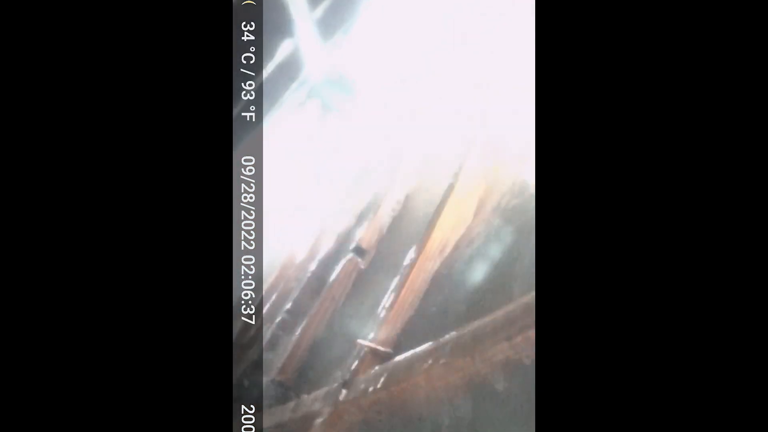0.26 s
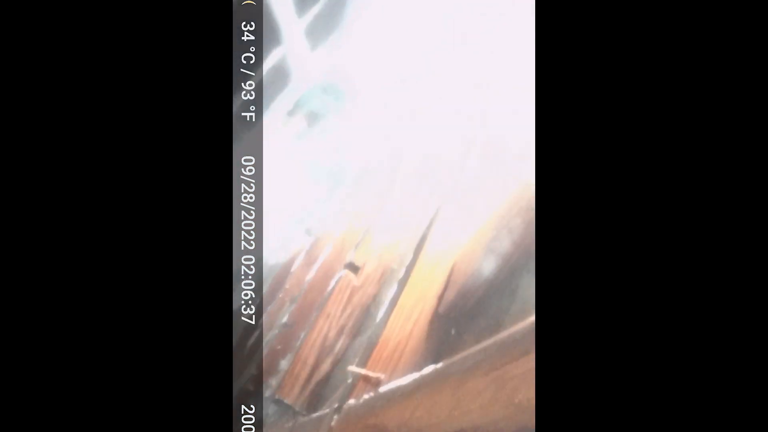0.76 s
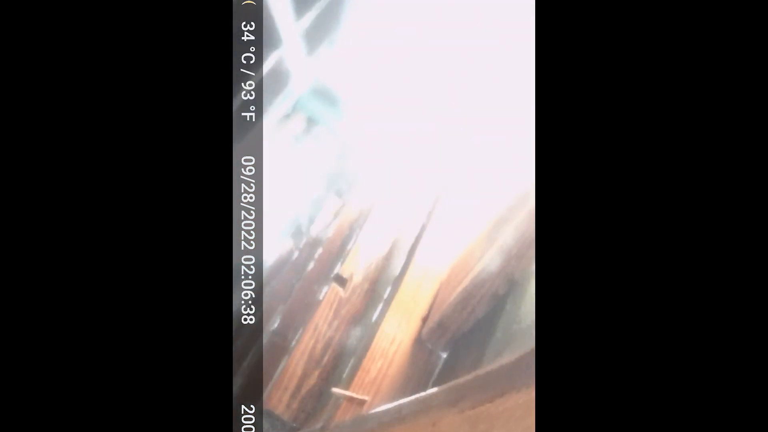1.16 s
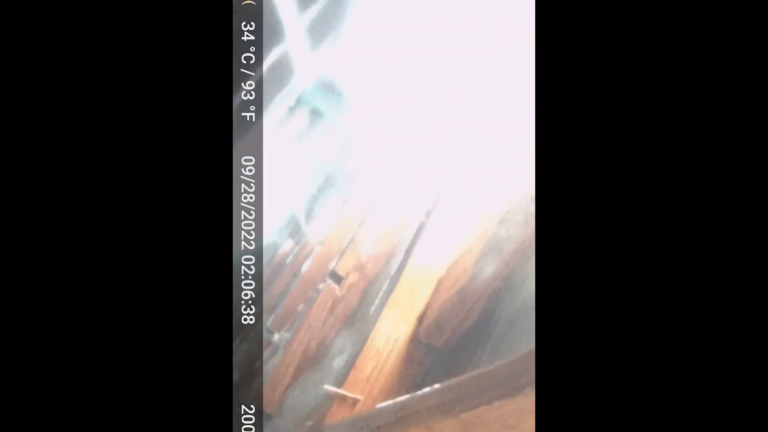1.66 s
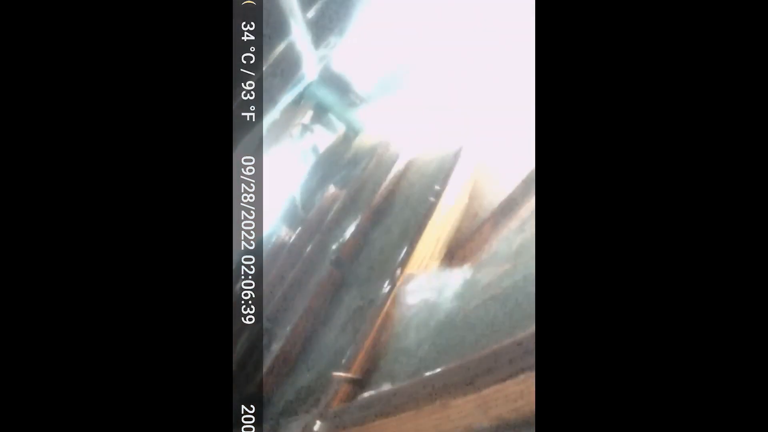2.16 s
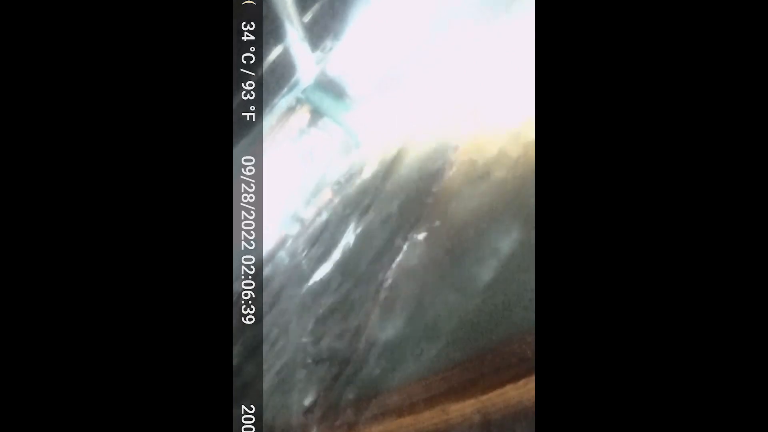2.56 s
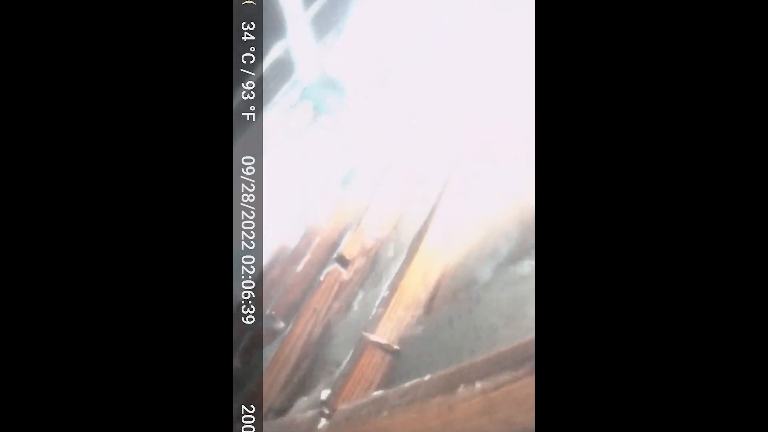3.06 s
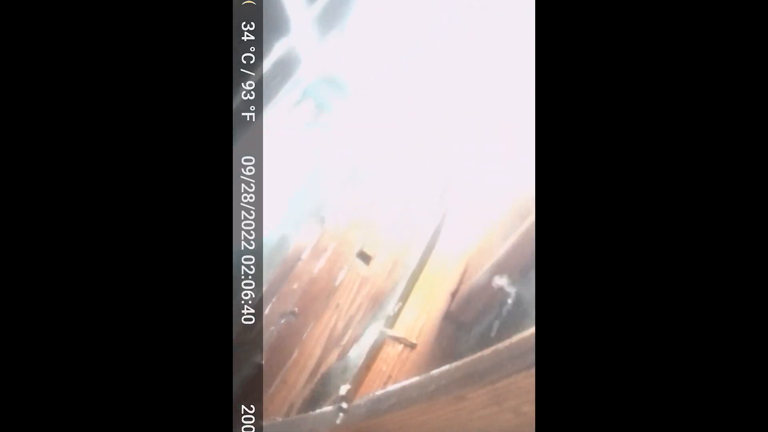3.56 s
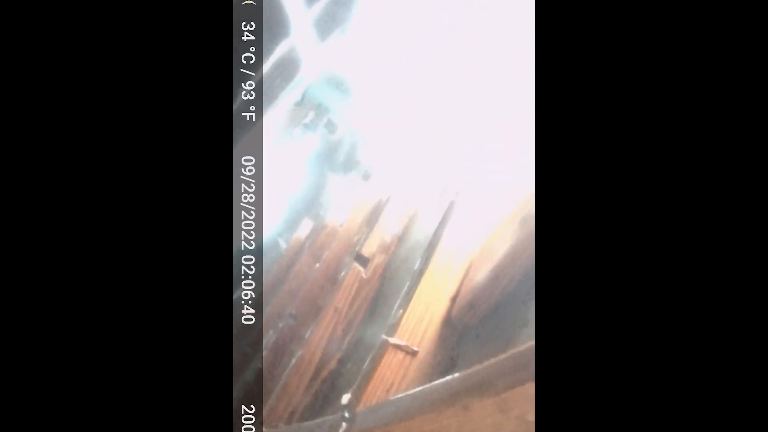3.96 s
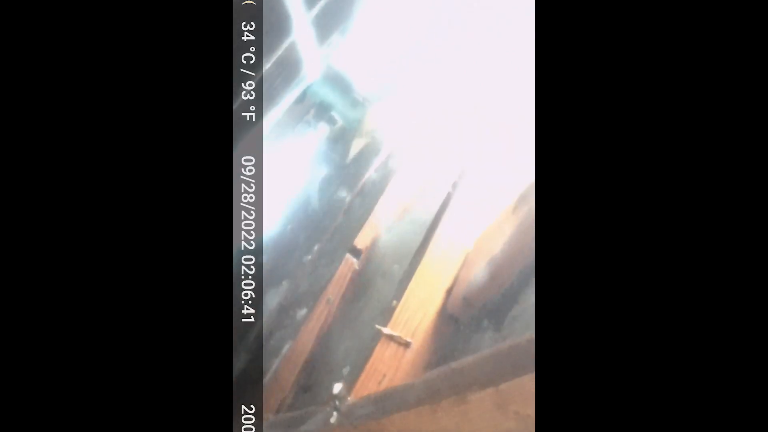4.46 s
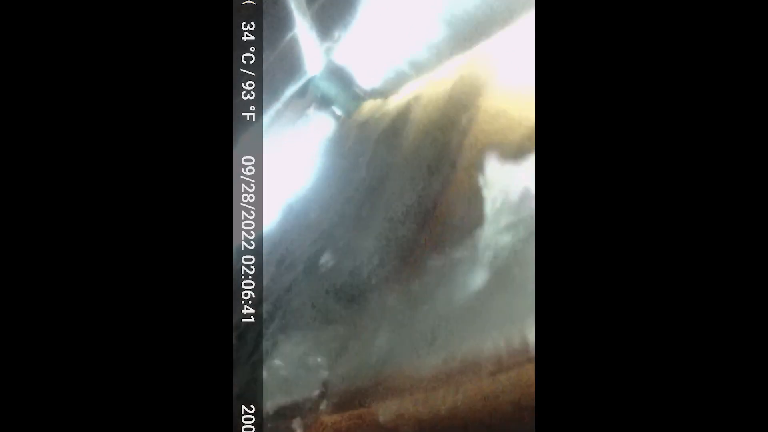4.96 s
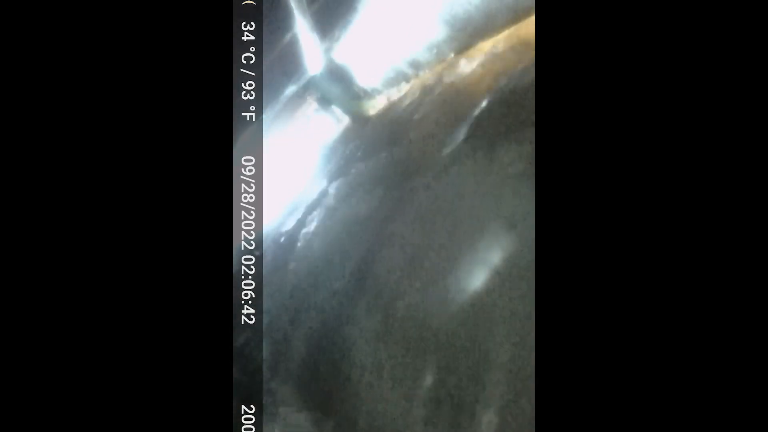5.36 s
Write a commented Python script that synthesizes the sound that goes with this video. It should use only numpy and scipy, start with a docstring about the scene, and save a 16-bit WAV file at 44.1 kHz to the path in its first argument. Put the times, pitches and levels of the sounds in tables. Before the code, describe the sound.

A harsh, distorted mid-low roar of wind and water surges and sputters, eases slightly, then swells again with knocks, spray and ticks.

```python
"""A roar near 480 Hz surges and crackles: hurricane wind and surf over a small outdoor camera housing.
Flow rings the housing's cavity (warped noise plus a tone) and buffets the port with low noise and thuds.
Water slaps drive the cavity; spray, bubbles and drops are noise ticks and short decaying notes.
The overloaded microphone saturates, droops and clips; sheets of water choke the port."""
import sys
import numpy as np
from scipy import signal
from scipy.fft import rfft, irfft, next_fast_len
from scipy.io import wavfile
from scipy.ndimage import map_coordinates

SR = 44100
rng = np.random.default_rng(int(sys.argv[2]) if len(sys.argv) > 2 else 0)


def pcm_store(signal):
    """Save signal as 16-bit PCM."""
    levels = np.round(np.clip(np.atleast_2d(signal), -1, 1) * 32767)
    wavfile.write(sys.argv[1], SR, levels.astype(np.int16).T)


N = 246959

# flow strength: time_s, roar_db
FLOW_STRENGTH = [(0, -5), (.2, -8), (.45, -9), (.8, -12.5), (1.05, -12.5), (1.302, -14), (1.982, -15.5),
                 (2.392, -6.5), (2.519, -12), (3.031, -13.5), (3.3, -11.5), (3.37, 0), (3.6, -8),
                 (3.95, -9), (4.12, -12), (4.72, -13), (4.9, -4.5), (5.26, -1.5), (5.6, 1)]
# cavity pitch, shifted by water around the opening: time_s, pitch_hz
CAVITY_PITCH = [(0, 485.4), (.47, 462.5), (.64, 486.8), (.69, 525.9), (.9, 477.9), (1.32, 470.7),
                (1.401, 504.1), (1.61, 470.6), (1.741, 511.8), (1.92, 459.7), (2.039, 478.6), (2.34, 452.6),
                (2.563, 483.7), (2.85, 452.3), (2.949, 478.1), (3.121, 459.2), (3.3, 485), (3.371, 452.6),
                (3.519, 520.2), (3.619, 480.4), (3.78, 484.5), (3.879, 505.5), (3.97, 476.2),
                (4.067, 530.2), (4.149, 480.4), (4.372, 497.2), (4.68, 474.7), (5.028, 515.3),
                (5.328, 452.2), (5.419, 493.5), (5.6, 452.5)]
# purity of the cavity's note: time_s, tone_over_ring_db
CAVITY_TONE = [(0, -14), (1.201, -7.5), (1.751, 0), (2.1, -14.5), (3.2, -2), (3.55, -0.5), (3.75, 9.5),
               (3.88, -2.5), (4.05, 4.5), (4.2, -10.5), (5.6, -21)]
# gusts head-on to the port: crest_s, level_db, width_s
GUSTS = [(.08, -6, .07), (0.314, -2.5, 0.0484), (0.708, -6.5, 0.15), (1.041, -3.5, 0.1107),
         (1.389, -3.5, 0.013), (1.479, -5.5, 0.06), (1.59, -7, .025), (1.834, -9, .022), (2.051, -4, 0.055),
         (2.125, -1.5, 0.069), (2.225, -6, 0.027), (2.3, -8, .03), (2.404, -8, 0.1025), (2.495, -7, 0.0202),
         (2.891, -18.5, 0.013), (3.507, -0.5, 0.034), (3.636, -4.5, .03), (3.699, 1, 0.021),
         (3.872, -1, 0.1058), (3.99, -4.5, 0.0254), (4.349, -8, 0.04), (4.85, -3.5, 0.0566),
         (4.951, -12.5, 0.067), (5.21, -3, 0.07), (5.46, -0.5, 0.035)]
# water striking the housing: start_s, level_db, length_s, thud_relative_db
SLAPS = [(0.015, -3.5, 0.0078, -18.5), (0.065, -16, 0.0086, 5.5), (0.129, -13, .012, -8),
         (0.159, -7, 0.018, -5.5), (0.238, -12, .012, -9.5), (0.393, -12.5, .02, -11),
         (0.431, -15, 0.0092, -25.5), (.58, -6, 0.0068, -10), (0.631, -8.5, 0.004, -8.5),
         (0.643, 8, 0.0238, -9), (0.672, 2.5, 0.0201, -5.5), (0.697, -15, 0.0263, 3),
         (0.757, -15, 0.014, -8.5), (0.845, -11.5, 0.014, -3.5), (0.89, -14.5, .01, -8.5),
         (0.969, -15, 0.0118, -19), (1.04, -11, 0.0187, -8), (1.194, -10.5, 0.0073, -10),
         (1.244, -15, 0.0383, -5.5), (1.303, -14.5, 0.018, -14.5), (1.442, -14.5, 0.015, -12),
         (1.528, -15, 0.0096, -11), (1.567, -14, 0.017, -7.5), (1.634, -11.5, 0.0154, -17),
         (1.666, -5, 0.014, -26.5), (1.723, -21, 0.0494, -24), (1.814, -15.5, 0.0277, -10),
         (1.904, 2.5, 0.00517, 0.5), (1.941, -17.5, 0.0186, 3.5), (2.014, -18.5, 0.011, -3),
         (2.082, 16, 0.01525, 0), (2.167, -12, 0.012, -9), (2.271, -6.5, 0.0057, 5.5),
         (2.37, -2.5, 0.0098, -9.5), (2.657, -10.5, 0.011, -19), (2.749, -15.5, 0.0064, -10),
         (2.781, -11, 0.034, -20.5), (2.837, -16, 0.017, -15.5), (2.94, -15, 0.0164, -16),
         (2.996, -8, 0.00454, -14), (3.082, -9.5, 0.018, -23.5), (3.112, -12.5, .008, -16),
         (3.17, -4.5, 0.015, -20), (3.216, -4.5, 0.0045, -16.5), (3.234, -7.5, 0.0057, -9.5),
         (3.323, 4.5, 0.015, -17.5), (3.413, -2, 0.018, -9), (3.491, -4, 0.017, -5.5),
         (3.519, -12, 0.016, -9), (3.561, -16.5, 0.0042, -6.5), (3.599, -8.5, 0.027, -6.5),
         (3.666, -12.5, 0.012, -9), (3.714, -3.5, 0.019, -8), (3.771, -8, 0.019, -20.5),
         (3.846, -10, 0.009, -4), (3.882, -7, 0.018, -10), (3.922, -5.5, 0.0351, -9),
         (4.009, -2.5, 0.05455, -21), (4.19, -14, 0.0137, -4.5), (4.229, -15.5, 0.0223, -4),
         (4.276, -13, 0.0176, -16.5), (4.321, -7, .014, -10), (4.44, -16, 0.0145, -3),
         (4.498, -8.5, 0.006, 1), (4.513, -6.5, 0.006, -1.5), (4.677, -9.5, 0.0108, -1.5),
         (4.715, -13, 0.0074, -4.5), (4.747, -12.5, 0.0122, 3), (4.823, -6, 0.0054, -12.5),
         (4.841, -8, 0.0028, 5), (4.862, -14, 0.011, -6), (5.019, -2, 0.0046, -3), (5.051, -9, 0.0254, -12),
         (5.215, 8, 0.0055, -8.5), (5.257, -5, 0.034, -19.5), (5.394, -18, 0.021, 22),
         (5.544, -5.5, .06, 6.5)]
# sheets of water sealing the port: middle_s, width_s, depth_db
SEALS = [(.37, 0.014, 7.5), (.568, 0.02, 7), (.625, 0.0091, 7.5), (0.811, 0.0147, 6), (1.175, 0.0207, 6.5),
         (1.229, 0.02, 7.5), (1.339, 0.018, 14), (1.403, 0.017, 21), (1.428, .028, 7), (1.718, 0.0245, 21),
         (1.789, 0.0115, 18), (1.886, 0.012, 8), (1.922, 0.01774, 30), (1.994, 0.011, 14.5),
         (2.074, 0.012, 24.5), (2.472, 0.0209, 13), (2.545, 0.016, 9), (2.73, 0.027, 7), (2.972, 0.0124, 9),
         (3.03, 0.023, 8.5), (3.159, 0.016, 7), (3.562, 0.0129, 22.5), (3.964, 0.0091, 25),
         (4.16, 0.0267, 7.5), (4.259, 0.0119, 6.5), (4.416, 0.0127, 12), (4.468, 0.0124, 22.5),
         (4.613, 0.0076, 7.5), (5.012, 0.0137, 31.5), (5.234, 0.0058, 8.5), (5.312, 0.0077, 17.5),
         (5.364, .006, 12), (5.38, 0.0155, 34.5)]
# air pocket opening at the port: start_s, level_db, start_pitch_hz, decay_s
PLOP = (3.5, -3, 1496.5, 0.0005)
# fine spray on the housing: time_s, level_db
WASH_LEVEL = [(0, -33), (.4, -36), (.8, -46.5), (1.05, -42), (1.3, -48.5), (2, -46), (2.3, -41),
              (3.05, -50.5), (3.3, -42), (3.4, -34), (3.9, -36), (4.15, -45.5), (4.7, -45), (4.95, -35),
              (5.6, -30)]
# short notes mostly near 1 kHz, about an octave above the roar: start_s, level_db, pitch_hz
BLIPS = [(.858, -15, 1042), (.893, -14, 1025), (1.15, -12, 769), (1.261, -18, 930), (1.283, -14, 990),
         (1.413, -18, 1023), (1.432, -16, 976), (1.485, -17, 995), (1.531, -17, 1034), (1.624, -15, 1016),
         (1.669, -17, 1400), (2.555, -12, 915), (3.218, -11, 1520), (3.778, -11, 1480), (4.452, -18, 1068),
         (4.516, -14, 1350), (4.545, -12, 982)]
# drops on the shell: start_s, level_db, decay_s
DROPS = [(0.65, -7.5, 0.0033), (.674, -8.5, .003), (2.083, 19.5, 0.0019), (2.574, -30, 0.0018),
         (3.156, -19.5, 0.0033), (3.163, -14.5, 0.0014), (3.182, -18.5, 0.0013), (3.261, -25, 0.0011),
         (3.282, -31, 0.002), (4.899, -16.5, 0.0019)]
# spectrum of the cavity's ring: freq_hz, density_db
CAVITY_SPECTRUM = [(60, -35.5), (250, -36), (340, -15), (410, -8.5), (480, -2.5), (540, -6.5), (620, -18),
                   (760, -36), (950, -34), (1250, -47), (1500, -49), (2000, -58.5), (4000, -73),
                   (9000, -99)]
# spectrum of the buffeting: freq_hz, density_db
BUFFET_SPECTRUM = [(15, 0), (30, -2.5), (60, 1.5), (100, -4), (150, -4.5), (220, -21), (320, -26.5),
                   (600, -42.5), (1500, -80)]
# spectrum of the low thuds: freq_hz, density_db
THUD_SPECTRUM = [(30, -1), (120, -5), (240, -2), (400, -10.5), (800, -29), (2000, -56.5), (8000, -74)]
# spectrum of the slow pressure swings: freq_hz, density_db
HEAVE_SPECTRUM = [(4, -4), (10, -3), (18, 4.5), (30, -11.5), (48, -31), (90, -84)]
# spectrum of wet air at the port: freq_hz, density_db
SPRAY_SPECTRUM = [(500, -11), (1200, 6), (2800, 0), (4500, -12), (7200, -28.5), (10000, -25)]
# spectrum of spray on the housing: freq_hz, density_db
WASH_SPECTRUM = [(400, -9), (1000, 5.5), (2000, -8), (4500, -20), (5600, -26.5), (7400, -24), (10000, -40)]
# spectrum of ticks on the shell: freq_hz, density_db
SHELL_SPECTRUM = [(500, 12.5), (1200, 3), (3000, 1), (5500, -1), (7200, -0.5), (10000, -2)]
# treble roll-off of the microphone chain: freq_hz, gain_db
TREBLE_RESPONSE = [(3500, 0), (7000, -1), (8600, -7), (9500, -10.5), (10300, -24), (11000, -50)]

# levels at 0 dB flow; *_DB_PER_DB is growth with flow
BUFFET_DB, BUFFET_DB_PER_DB = -15, 0.055
THUD_DB, THUD_DB_PER_DB, GUST_THUD_DB = -6, 1.803, -7
HEAVE_DB, HEAVE_DB_PER_DB = -6, 0.414
LOW_LIMIT = .75  # soft limit of low swings between gusts
CAVITY_HZ = 483.05  # pitch described by CAVITY_SPECTRUM
FLUTTER_SHARE, FLOW_FLUTTER_SHARE = .03, 0.0498  # of the pitch; second scales with flow gain
SLAP_ATTACK_S, SLAP_SAG_DB_PER_S, SLAP_RING_S = 0.0033, 50, 0.00545
SLAP_ROUGH_DB, SLAP_FIZZ_DB = 1.5, -35  # fizz relative to the cavity's ring
SEAL_PUSH = 0.4  # steady pressure of a full seal on the diaphragm
WASH_SEALED_SHARE = .1  # share of seal depth (dB) that muffles spray and foam
DROPLETS_PER_S, DROPLETS_DB_PER_DB = 6000, .9  # rate in the thickest spray; growth with spray
DROPLET_SCATTER_DB, FLURRY_DB = 5, 3
BUBBLES_PER_S, BUBBLE_HZ, BUBBLE_OCTAVES = 140, 1603, .6  # rate, middle pitch, spread
BUBBLE_DB, BUBBLE_SCATTER_DB = 4, 3  # relative to WASH_LEVEL, spread
BLIP_RISE_S, BLIP_CYCLES, BLIP_GLIDE = .003, 6, .02  # swell, cycles per decay, pitch climb per decay
HUM_HZ, HUM_WIDTH_HZ, HUM_DB, HUM_SWELL_DB = 68.8, 21, -24.5, 3.5
HISS_DB, TOP_HZ = -63.5, 11000


def storm():
    """Flow strength in dB at every sample."""
    return np.interp(clock(), *np.transpose(FLOW_STRENGTH))


def cavity():
    """Air in the housing rings: noise read at a varying speed slides in pitch, with a sine as its pure note."""
    flutter = FLUTTER_SHARE * wobble(rate=22)
    flutter = flutter + FLOW_FLUTTER_SHARE * amp(storm()) * wobble(rate=70)
    pitch_hz = np.interp(clock(), *np.transpose(CAVITY_PITCH)) * (1 + flutter)
    position = np.cumsum(pitch_hz / CAVITY_HZ)
    ring = map_coordinates(noise(CAVITY_SPECTRUM), [position], mode="mirror")
    tone_gain = amp(np.interp(clock(), *np.transpose(CAVITY_TONE)))
    tone = tone_gain * np.sin(2 * np.pi * np.cumsum(pitch_hz) / SR)
    return ring + tone


def flow(air):
    """Turbulence blows across the cavity in puffs and buffets the port."""
    roar_db = storm()
    gusts = sum(amp(db) * hump(s, width) for s, db, width in GUSTS)
    # weak flow puffs deeply, strong flow is more continuous
    puff_db = np.clip(0.9 - 0.09 * roar_db, .8, 2.6)
    eddies_db = puff_db * wobble(rate=90)
    roar = amp(roar_db + eddies_db - 1.56) * steady(air, span=0.0405)

    push = amp(BUFFET_DB + BUFFET_DB_PER_DB * roar_db) + amp(-6.0) * gusts
    buffet = push * amp(3.255 * wobble(rate=40)) * steady(noise(BUFFET_SPECTRUM), span=0.053)

    thud_db = THUD_DB + THUD_DB_PER_DB * roar_db + 5.63 * wobble(rate=45) + eddies_db
    thud_gain = amp(thud_db) + amp(GUST_THUD_DB) * gusts
    thuds = thud_gain * steady(noise(THUD_SPECTRUM), span=0.06)

    # slow swings lean the diaphragm, so even a moderate roar rasps in puffs
    heave_gain = amp(HEAVE_DB + HEAVE_DB_PER_DB * roar_db)
    heave = heave_gain * steady(noise(HEAVE_SPECTRUM), span=0.13)

    # the housing vents the biggest low swings
    low_top = LOW_LIMIT + amp(-2.0) * gusts
    return roar + saturate(buffet + thuds + heave, top=low_top, hardness=4.3)


def slaps(air):
    """Each slap drives the cavity and thuds: fast rise, sag while it lasts, ring-out."""
    t, force, weight = clock(), np.zeros(N), np.zeros(N)
    for s, db, length, thud_db in SLAPS:
        near = slice(*np.searchsorted(t, [s, s + length + 10 * SLAP_RING_S]))
        age = t[near] - s
        rise = np.minimum(age / SLAP_ATTACK_S, 1)
        ring_out = np.exp(-np.maximum(age - length, 0) / SLAP_RING_S)
        blow = amp(db - SLAP_SAG_DB_PER_S * age) * rise * ring_out
        force[near] += blow
        weight[near] += amp(thud_db) * blow
    rough = amp(SLAP_ROUGH_DB * wobble(rate=250))  # water breaking up
    ring = rough * (steady(air, span=0.018) + amp(SLAP_FIZZ_DB) * noise(SPRAY_SPECTRUM))
    return force * ring + weight * steady(noise(THUD_SPECTRUM), span=0.012)


def opening():
    """Gain of the port past the sheets of water."""
    return amp(-sum(depth_db * hump(s, width) for s, width, depth_db in SEALS))


def spray(pressure):
    """Wet air pumped through the port fizzes in spurts with the pressure swing."""
    swing = np.minimum(np.abs(pressure), 1)
    spurts = amp(4.9 * wobble(rate=360)) * swing ** 3.05
    return amp(-31.5) * spurts * noise(SPRAY_SPECTRUM)


def plop():
    """A small air pocket opens at the port; its note falls quickly to the cavity's pitch."""
    s, db, hz, decay = PLOP
    age = np.maximum(clock() - s, 0)
    pitch_hz = CAVITY_HZ + (hz - CAVITY_HZ) * np.exp(-age / decay)
    phase = 2 * np.pi * np.cumsum(pitch_hz * (age > 0)) / SR
    return amp(db) * np.exp(-age / decay) * np.sin(phase)


def drops():
    """Drops tick on the shell: bright noise, instant onset, exponential decay."""
    t = clock()
    force = sum(amp(db) * (t >= s) * np.exp(-np.abs(t - s) / decay) for s, db, decay in DROPS)
    return force * noise(SHELL_SPECTRUM)


def blips(rows):
    """Short notes ring for a few cycles with a slightly rising pitch."""
    out, age = np.zeros(N + SR), np.arange(SR // 20) / SR
    for s, db, hz in rows:
        decays = age * hz / BLIP_CYCLES
        note = np.sin(2 * np.pi * hz * age * (1 + BLIP_GLIDE * decays / 2))
        swell = 1 - np.exp(-age / BLIP_RISE_S)
        out[int(s * SR):][:len(age)] += amp(db) * swell * np.exp(-decays) * note
    return out[:N]


def foam():
    """Bubbles of random size burst at random in the water running over the housing."""
    when_s = np.flatnonzero(rng.random(N) < BUBBLES_PER_S / SR) / SR
    size, loudness = np.clip(rng.standard_normal((len(when_s), 2)), -2, 2).T
    spray_db = np.interp(when_s, *np.transpose(WASH_LEVEL))
    level_db = spray_db + BUBBLE_DB + BUBBLE_SCATTER_DB * loudness
    return blips(zip(when_s, level_db, BUBBLE_HZ * 2 ** (BUBBLE_OCTAVES * size)))


def wash():
    """Fine spray rains on the housing: random impulses, sparser in lulls and denser with each wave."""
    spray_db = np.interp(clock(), *np.transpose(WASH_LEVEL))
    density = amp(DROPLETS_DB_PER_DB * (spray_db - spray_db.max()))
    landed = rng.random(N) < DROPLETS_PER_S * density / SR
    sizes = rng.standard_normal(N) * amp(DROPLET_SCATTER_DB * rng.standard_normal(N))
    droplets = saturate(landed * sizes, top=5.3, hardness=2.3)
    flurries = amp(FLURRY_DB * wobble(rate=110))
    # dividing by sqrt(density) leaves the level to spray_db
    patter = unit(coloured(droplets / np.sqrt(density), WASH_SPECTRUM))
    return amp(spray_db) * flurries * patter


def hum():
    """A narrow low resonance excited by the wind swells and fades."""
    band = filtered(rng.standard_normal(N), lambda hz: 1 / (1 + (2 * (hz - HUM_HZ) / HUM_WIDTH_HZ) ** 2))
    return amp(HUM_DB + HUM_SWELL_DB * wobble(rate=7.4)) * unit(band)


def amp(db):
    """Decibels to gain."""
    return 10 ** (np.asarray(db) / 20)


def unit(x):
    """x at rms 1."""
    return x / np.sqrt(np.mean(x ** 2) + 1e-20)


def clock():
    """Time of every sample in s."""
    return np.arange(N) / SR


def wobble(rate):
    """Smooth random curve, rate knots per s."""
    return map_coordinates(rng.standard_normal(int(N * rate / SR) + 4), [clock() * rate])


def hump(s, width):
    """Rounded swell of height 1, crest at s, 1/e full width in s."""
    return np.exp(-np.abs(2 * (clock() - s) / width) ** 3)


def filtered(x, response):
    """x times a complex response of frequency."""
    size = next_fast_len(N + 8192)
    return irfft(rfft(x, size) * response(np.fft.rfftfreq(size, 1 / SR)), size)[:N]


def coloured(x, points):
    """x shaped by (Hz, dB) points on a log axis."""
    f, db = np.transpose(points)
    return filtered(x, lambda hz: amp(np.interp(np.log(hz + 1), np.log(f), db)))


def noise(points):
    """Coloured noise of rms 1."""
    return unit(coloured(rng.standard_normal(N), points))


def high_pass(x, cut_hz, damping):
    """Causal second-order bass cut."""
    return filtered(x, lambda hz: -hz ** 2 / (cut_hz ** 2 - hz ** 2 + 1j * damping * cut_hz * hz))


def steady(x, span):
    """Keeps fast flutter, evens out swells longer than span s."""
    window = signal.windows.hann(int(span * SR) + 3)
    power = np.abs(signal.fftconvolve(x ** 2, window / window.sum(), "same"))
    return x / np.sqrt(power + .02)


def saturate(x, top, hardness):
    """Bends x over towards +-top."""
    return x / (1 + np.abs(x / top) ** hardness) ** (1 / hardness)


def scene():
    """Pressure at the port: a sheet of water shuts out the flow and pushes, but only dulls spray and foam."""
    air, clear = cavity(), opening()
    pressure = flow(air) + hum() + slaps(air) + plop()
    port = clear * (pressure + spray(pressure)) + SEAL_PUSH * (1 - clear)
    water = clear ** WASH_SEALED_SHARE * (wash() + foam())
    return (port + water + drops() + blips(BLIPS))[None]


def record(dry):
    """The diaphragm saturates, bass cuts make its flat tops droop, the amplifier clips the peaks."""
    lean = 0.1629  # rest offset: one side flattens first
    diaphragm = saturate(dry[0] + lean, top=0.6382, hardness=16.9) - lean
    # even pinned, it gives a little
    diaphragm = diaphragm + amp(-38.5) * saturate(dry[0], top=1.2, hardness=0.68)
    # bends more easily one way: adds the octave
    bowed = diaphragm + amp(-21) * diaphragm ** 2
    coupled = high_pass(bowed, cut_hz=36, damping=1)
    drooping = high_pass(coupled, cut_hz=61.7, damping=1.6)
    hiss = amp(HISS_DB) * rng.standard_normal(N)
    clipped = np.clip(drooping + hiss, -.69, .69)
    voiced = coloured(clipped, [(1500, 0)] + TREBLE_RESPONSE)
    return filtered(voiced, lambda hz: hz < TOP_HZ)[None]


dry = scene()
out = record(dry)
pcm_store(out)
```